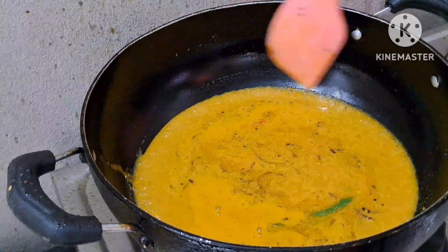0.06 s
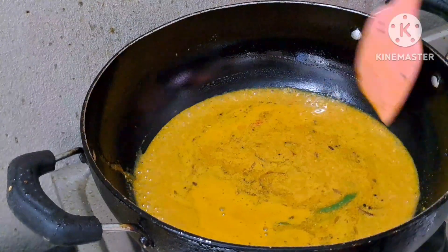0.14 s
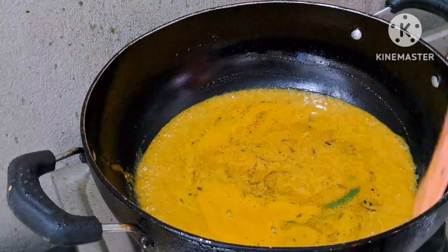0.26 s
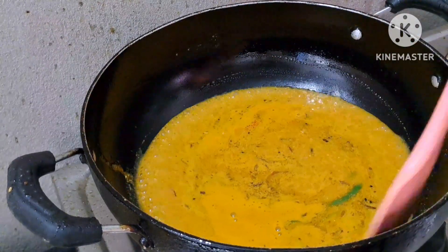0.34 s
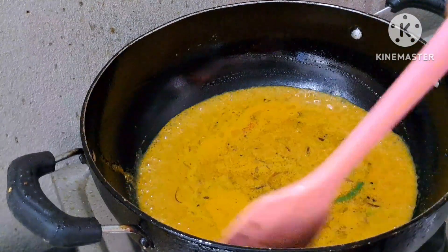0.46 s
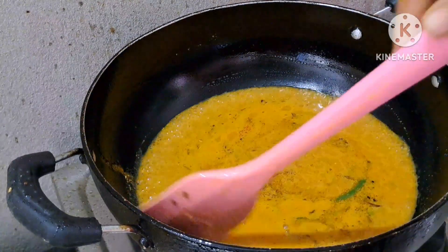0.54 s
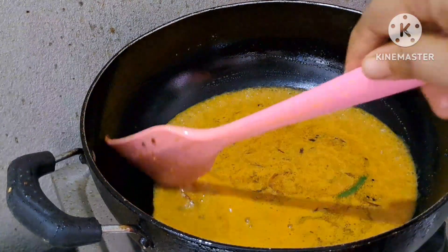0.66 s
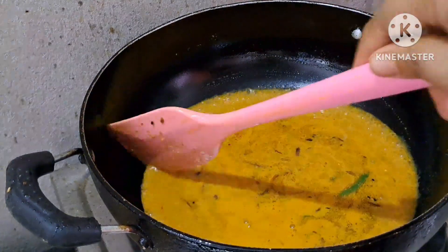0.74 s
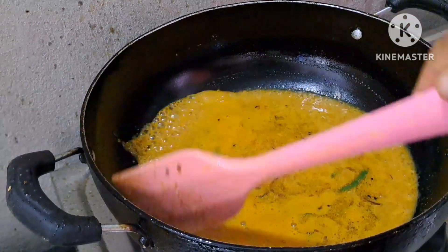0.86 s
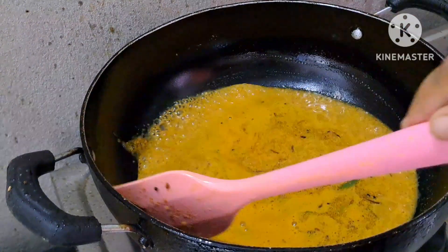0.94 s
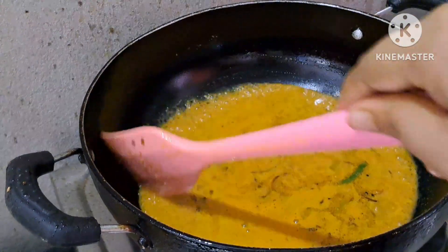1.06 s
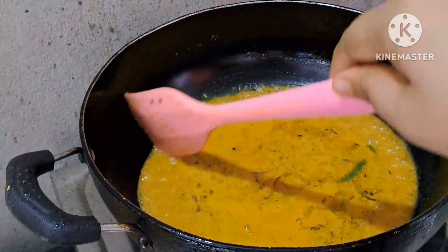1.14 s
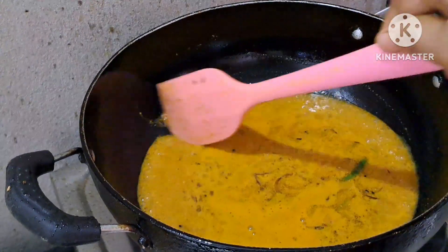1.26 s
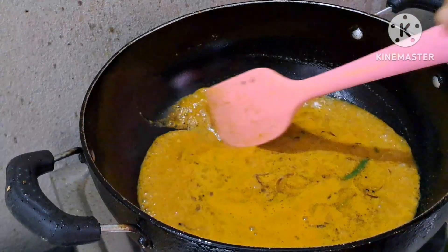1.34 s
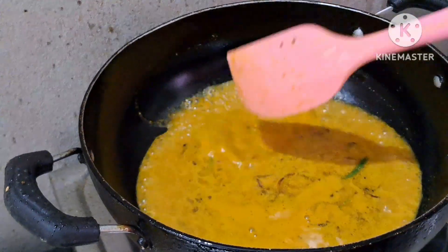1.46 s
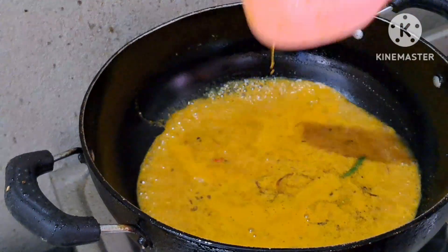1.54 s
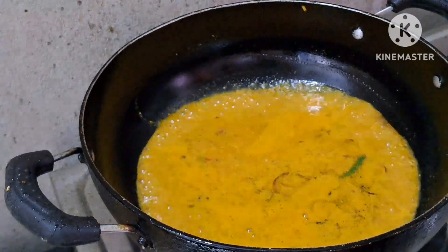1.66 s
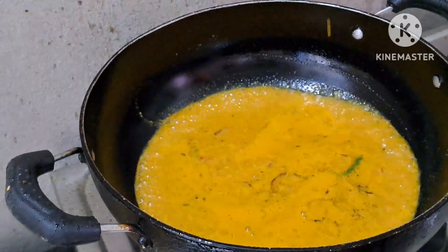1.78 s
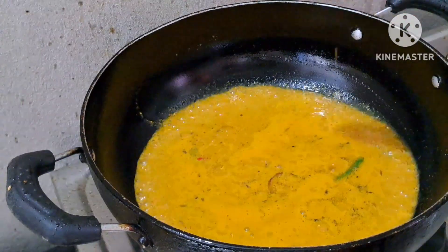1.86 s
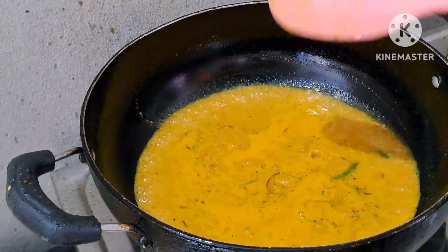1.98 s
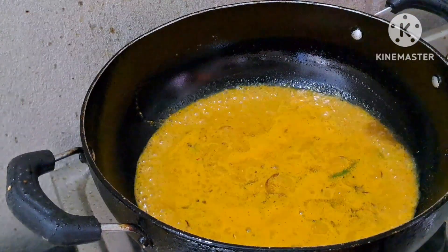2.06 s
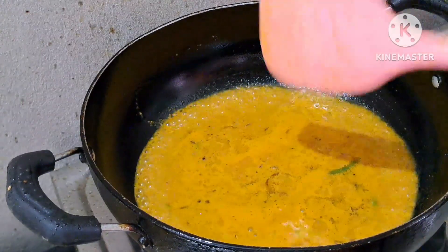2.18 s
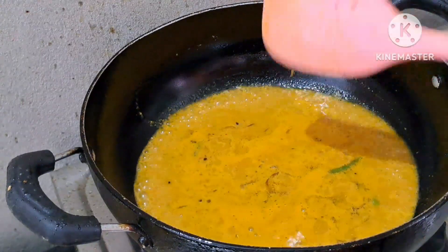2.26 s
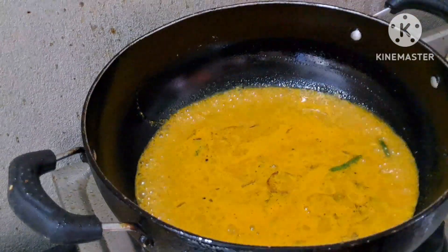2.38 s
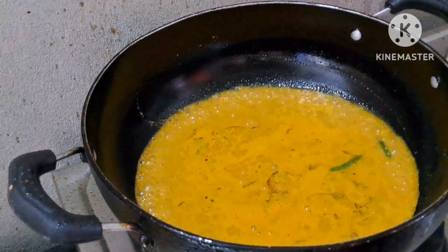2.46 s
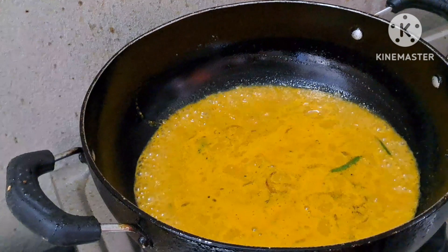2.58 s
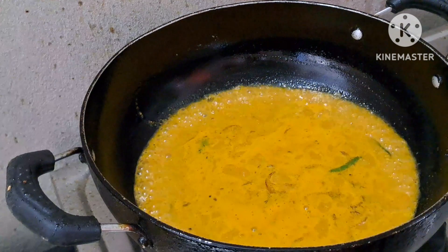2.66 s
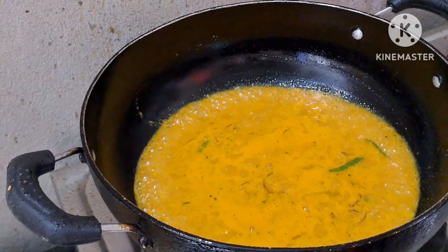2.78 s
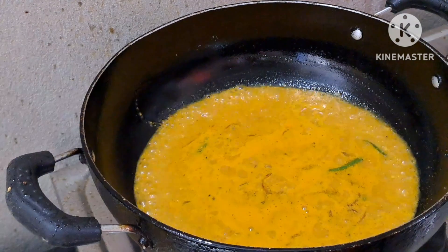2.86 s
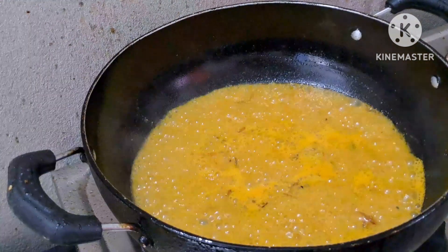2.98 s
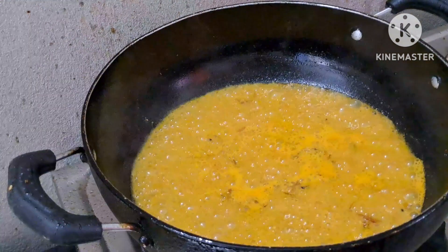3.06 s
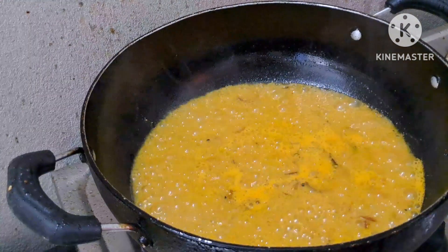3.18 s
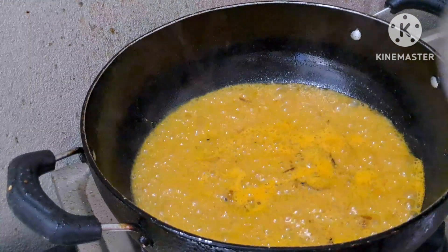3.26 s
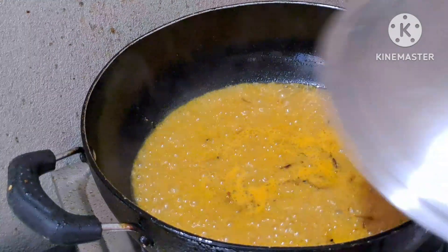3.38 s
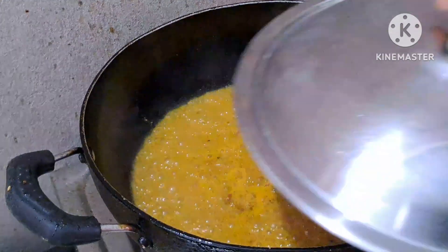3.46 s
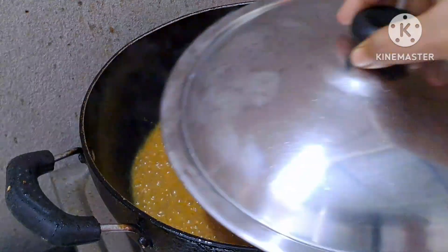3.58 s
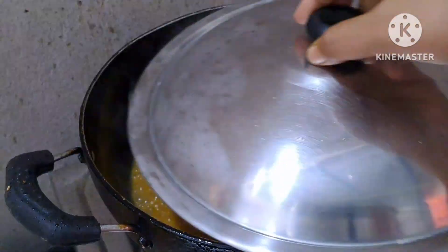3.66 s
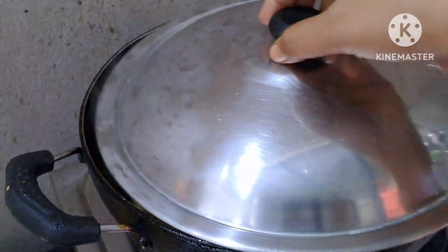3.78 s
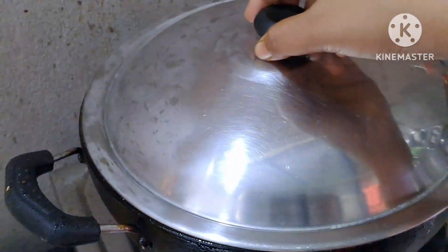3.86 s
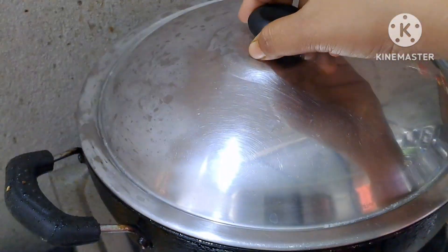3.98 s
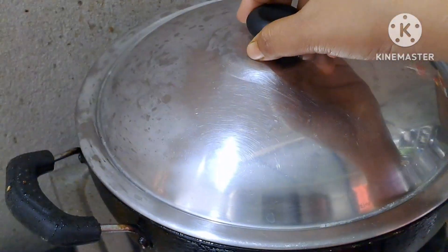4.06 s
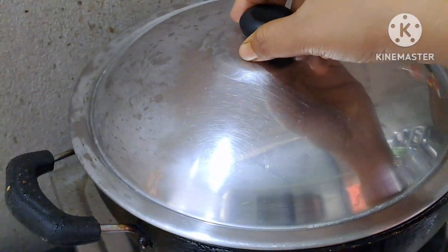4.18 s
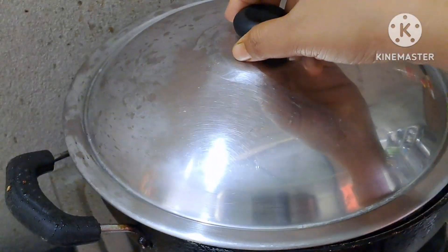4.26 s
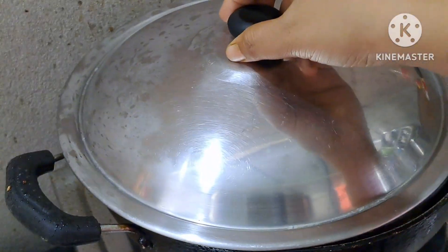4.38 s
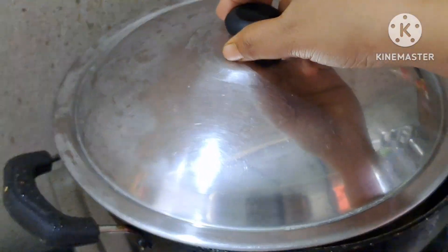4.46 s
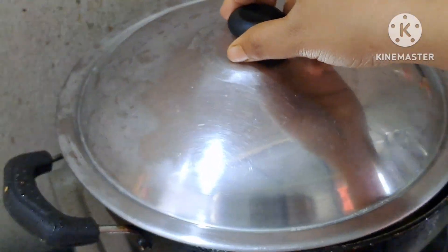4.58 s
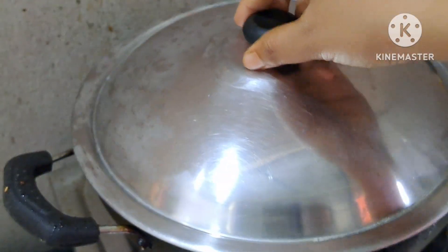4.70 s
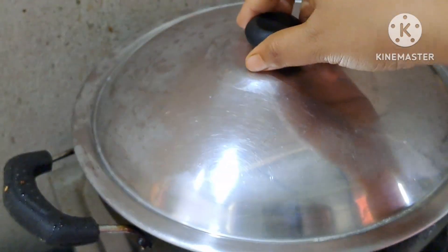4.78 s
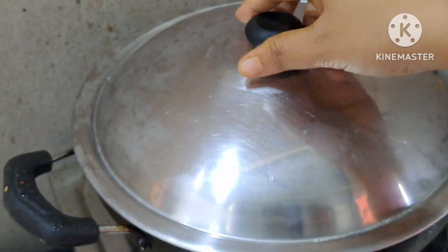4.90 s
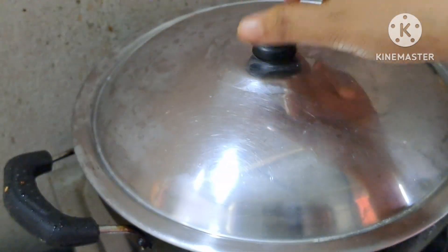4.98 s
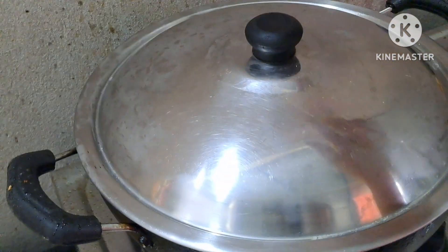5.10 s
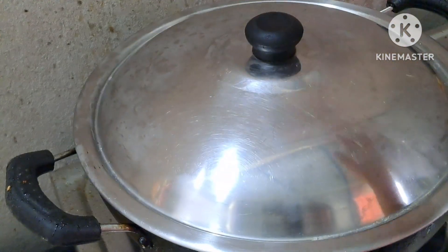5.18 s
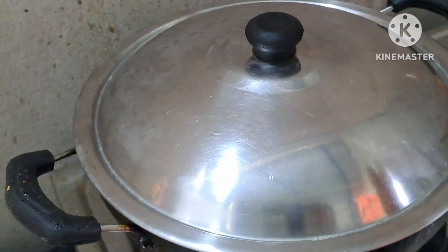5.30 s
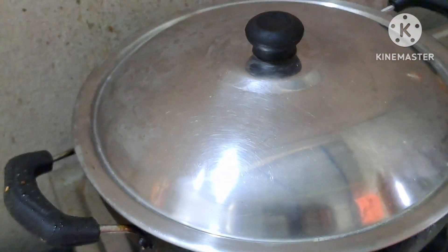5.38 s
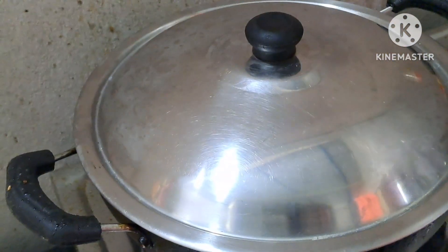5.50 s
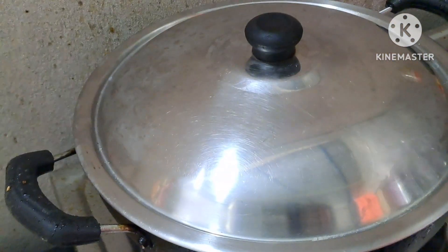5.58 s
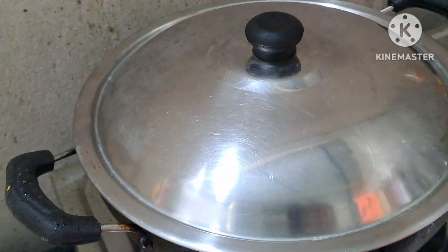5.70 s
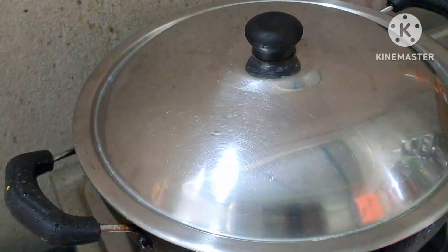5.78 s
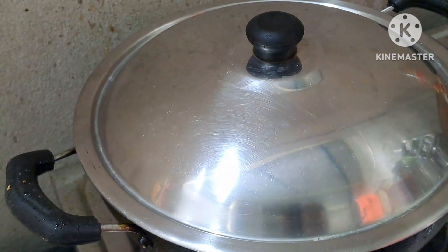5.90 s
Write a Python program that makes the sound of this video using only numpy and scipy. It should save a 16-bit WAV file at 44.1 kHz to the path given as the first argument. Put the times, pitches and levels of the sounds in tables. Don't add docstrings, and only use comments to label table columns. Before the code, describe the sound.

Close stereo microphones in a small kitchen pick up thick gravy simmering over a low burner rumble. A soft spatula bumps and wipes the pan, shaking the stove stand, and leaves a faint wet squeak. The sizzle livens up, then a steel lid clangs loudly on the rim and rattles. After small dull nudges it drops into place with a ringing clunk, and the simmering turns muffled and quiet.

```python
import sys
import numpy as np
from scipy import signal
from scipy.fft import rfft, irfft
from scipy.io import wavfile

SR = 44100
rng = np.random.default_rng(int(sys.argv[2]) if len(sys.argv) > 2 else 0)


def transcribe(u):
    v = np.clip(np.atleast_2d(u).T, -1, 1)
    q = np.round(v * 32767).astype(np.int16)
    wavfile.write(sys.argv[1], SR, q)


def attenuation_scalar(level_db):
    decades = np.asarray(level_db, float) / 20
    return 10 ** decades


N = 261954

# time in seconds, share of the pan covered.
COVER = [
    (0, 0.25),
    (3.55, 0.049),
    (4.1, 0.09),
    (4.9, 0.85),
    (5.94, 1),
]
# time in seconds,
# sizzle in dB.
VIGOUR = [(0, -53.5), (.2, -55), (.3, -58.5), (.55, -56.5), (.8, -58), (1.15, -55.5), (1.7, -57.5),
          (2.98, -56), (3.04, -53), (3.55, -54.5), (4.1, -62), (4.6, -64), (4.9, -59.5), (5.3, -66),
          (5.94, -63)]
# pitch in Hz, level in dB, t60 in seconds.
STAND = [(55.6, -1.5, 0.61), (105.6, 1.5, 0.38), (137.5, 0, 0.19), (195, -2.5, 0.31), (240, -20.5, 0.15)]
# pitch in Hz, level in dB per Hz.
CLATTER = [(53, -41), (90, -5), (307, -8.5), (350, -12.5), (443, -10.5), (538, -13), (1070, -7),
           (1550, -17), (2480, -7.5), (3990, -14), (4540, -10.5), (5630, -20.5), (15500, -30.5)]
# pitch in Hz, t60 in seconds.
TAIL_T60 = [(60, 0.93), (300, 0.58), (1000, 0.22), (4000, 0.61), (12000, 0.24)]
# pitch in Hz, left-right likeness.
CLOSE_LIKENESS = [(60, 0.95), (130, 1), (290, 0.89), (640, 0.52), (1410, 0.031), (3100, -1.4),
                  (6820, -0.33), (15000, -0.13)]
EDGES = 30 * 2 ** np.arange(0, 9.1, 1 / 3)
CENTRES = np.sqrt(EDGES[1:] * EDGES[:-1])


def in_time(rows):
    s, *columns = np.transpose(rows)
    return np.array([np.interp(np.arange(N) / SR, s, column) for column in columns])


def at_hz(points, hz):
    point_hz, values = np.transpose(points)
    return np.interp(np.log(hz), np.log(point_hz), values)


def across(columns, column_hz, hz):
    place = np.interp(np.log(hz), np.log(column_hz), np.arange(len(column_hz)))
    k = min(int(place), len(column_hz) - 2)
    return columns[k] + (place - k) * (columns[k + 1] - columns[k])


def rms_one(x):
    return x / np.sqrt(np.mean(x ** 2) + 1e-20)


def drift(rate):
    r = np.exp(-80 * np.pi * rate / SR)
    slow = signal.lfilter([1], [1, -2 * r, r * r], rng.standard_normal(N // 40 + 2002))[2000:]
    return np.interp(np.arange(N) / 40, np.arange(len(slow)), rms_one(slow))


def grains(per_s, spread_db):
    sizes = attenuation_scalar(spread_db * np.minimum(rng.exponential(1, N), 5)) * rng.choice([-1, 1], N)
    return rms_one(sizes * (rng.random(N) < per_s / SR))


def swells(rows, rise, fade):
    t = np.arange(N) / SR
    events = []
    for (s, hold, db), fall in zip(rows, np.broadcast_to(fade, len(rows))):
        lost_db = np.maximum(rise * (s - t), fall * (t - s - hold))
        events.append(db - np.maximum(lost_db, 0))
    top = np.max(events, axis=0)
    return np.where(top > -95, top, -200)


def strokes(rows, rise, linger):
    s, level_db, weight_db, hardness_db, fade = np.transpose(rows)
    parts = (weight_db, linger), (0, 1), (hardness_db, 1)
    drive = [swells(np.transpose([s, 0 * s, level_db + db]), rise, share * fade) for db, share in parts]
    return np.array(drive)


def touches(rows, thud_db):
    s, knock_db, hz, ring_db, hardness_db = np.transpose(rows)
    return np.transpose([s, knock_db, hz, knock_db + thud_db, ring_db, ring_db + hardness_db])


def ring(clicks, hz, t60, lag_s):
    pole, swell = attenuation_scalar(-60 / (np.array([t60, 2.18 / hz]) * SR)) * np.exp(2j * np.pi * hz / SR)
    unlike = np.arccos(np.clip(at_hz(CLOSE_LIKENESS, hz), -1, 1)) * rng.normal(0, 0.61)
    turn = 2 * np.pi * hz * lag_s + unlike
    driven = np.flatnonzero(clicks)
    span = slice(driven[0], driven[-1] + round(2 * t60 * SR))
    z = signal.lfilter([pole - swell], np.poly([pole, swell]), clicks[span] + 1e-18)
    out = np.zeros((2, N))
    out[:, span] = (z * np.exp(-1j * turn)).imag, z.imag
    return out


def struck(modes, hits, rubbing_db, column_hz, knock_cycles, hit_db, rub_db, tail_db, lag_s):
    s, knock_db, knock_hz, *blows_db = np.transpose(hits)
    at = np.round(s * SR).astype(int)
    slips = grains(per_s=1100, spread_db=3.0)
    sound = 0
    for i, level_db, hz in zip(at, knock_db, knock_hz):
        knock = (np.arange(N) == i) * attenuation_scalar(level_db + 1.0)
        sound = sound + ring(knock, hz, knock_cycles / hz, lag_s / 2)
    for hz, level_db, t60 in modes:
        clicks = slips * attenuation_scalar(across(rubbing_db, column_hz, hz) + rub_db)
        clicks[clicks ** 2 < 1e-16] = 0
        uneven = attenuation_scalar(rng.normal(0, 1.8, len(at))) * rng.choice([-1, 1], len(at))
        clicks[at] += attenuation_scalar(across(blows_db, column_hz, hz) + hit_db) * uneven
        sound = sound + attenuation_scalar(level_db) * ring(clicks, hz, t60, lag_s)
    wash = []
    for hz in CENTRES:
        energy = attenuation_scalar(2 * (across(rubbing_db, column_hz, hz) - 32.0))
        energy[at] += attenuation_scalar(2 * across(blows_db, column_hz, hz))
        crack = signal.lfilter([1], [1, -attenuation_scalar(-120 / (0.044 * SR))], energy)
        tail = signal.lfilter([1], [1, -attenuation_scalar(-120 / (at_hz(TAIL_T60, hz) * SR))], energy)
        wash.append((crack + attenuation_scalar(-31.5) * tail) * attenuation_scalar(2 * (tail_db + at_hz(CLATTER, hz))))
    return sound, np.array(wash)


def with_neighbours(modes, level_db, spread, t60_share):
    crowd = [(hz * (1 + spread * rng.normal()), db + level_db + rng.normal(0, 2.5), t60_share * t60)
             for hz, db, t60 in modes for _ in range(3)]
    return modes + crowd


def close_modes(level_db, t60_share):
    pitches = np.geomspace(330, 14000, 36) * rng.uniform(1.0, 1.03, 36)
    return [(hz, at_hz(CLATTER, hz) + level_db + rng.normal(0, 1.6), t60_share * at_hz(TAIL_T60, hz))
            for hz in pitches]


def lid_clanging(column_hz):
    # pitch in Hz, level in dB.
    free_modes = [(444.5, -49), (1042, -34), (1109, -29.5), (1781, -33), (2552, -33.5), (3112, -42),
                  (3268, -38), (3790, -49), (4250, -43), (4588, -37), (4916, -40), (5050, -43), (5362, -44),
                  (4690, -35), (6106, -50), (6885, -43.5), (7773, -50), (8070, -45), (8689, -52),
                  (9022, -62), (9641, -62), (10885, -59), (11321, -56.5)]
    more_free_modes = [(4410, -40), (826, -48.5), (1242, -45), (1410, -44.5), (2060, -76), (2319, -33.5),
                       (2404, -39)]
    # time in seconds, knock peak in dB, knock pitch in Hz, ring in dB, hardness in dB.
    clangs = [
        (3.596, -3.5, 1400, -10.5, -18.5),
        (3.608, -13, 1130, -12.5, -16.5),
        (3.658, -11, 1090, -15, -15),
        (3.681, -2.5, 1110, -18, 3),
        (3.734, -10.5, 1030, -20.5, 0.6),
        (3.761, -15, 990, -17, -6),
        (3.818, -13, 1140, -19, 0.5),
        (3.847, -17, 1080, -19.5, -3),
        (3.896, -10.5, 1160, -19, -11.5),
        (3.974, -20.5, 770, -28, -10),
    ]
    # time in seconds, thud under the knock in dB.
    lowering = [
        (3.6, -35),
        (3.85, -10),
    ]
    # start in seconds, ring in dB, weight in dB, hardness in dB, fade in dB per s.
    sliding = [
        (3.6, -27, -12, 0.5, 172.5),
        (3.688, -15, -23, 1, 148),
        (3.846, -39, 16, 21.5, 300.5),
        (3.91, -47, 19.5, 12, 200.5),
        (3.996, -31.5, -8, -11, 400),
    ]
    free = [(hz, level_db + 31.0, 0.4 * (1000 / hz) ** 0.32) for hz, level_db in free_modes + more_free_modes]
    free = with_neighbours(free, level_db=-9.5, spread=.028, t60_share=0.63)
    free = free + close_modes(level_db=-2.0, t60_share=0.67)
    stand = [(hz, level_db - 7.0, 0.77 * t60) for hz, level_db, t60 in STAND]
    thud_db = np.interp(np.array(clangs)[:, 0], *np.transpose(lowering))
    return struck(free + stand, touches(clangs, thud_db), strokes(sliding, rise=4600, linger=.52), column_hz,
                  knock_cycles=13.0, hit_db=-6.0, rub_db=-35.5, tail_db=2.5, lag_s=2e-4)


def lid_nudged(column_hz):
    # pitch in Hz, level in dB, t60 in seconds.
    dull_rim = [(224, -9, .12), (308, -1, 0.1), (364, -10, 0.089), (430, -1.5, 0.13), (750, -1.5, 0.12),
                (1200, -9, .1), (1750, -4, .12), (2060, -24, .3), (2344, -4, 0.11), (2548, -4, .06),
                (3280, -7.5, .05), (4440, -6, 0.04)]
    # time in seconds, knock peak in dB, knock pitch in Hz, ring in dB, hardness in dB.
    nudges = [
        (4.22, -46, 330, -71, 5),
        (4.266, -42, 308, -77, 9),
        (4.414, -34.5, 400, -50, -17),
        (4.689, -38.5, 430, -46, -24.5),
        (4.737, -35.5, 750, -35.5, -15),
        (4.758, -17, 295, -43, -8.5),
    ]
    # start in seconds, ring in dB, weight in dB, hardness in dB, fade in dB per s.
    shifting = [
        (4.272, -54.5, 8.5, 9.5, 150),
        (4.42, -51.5, 9, -1, 110),
        (4.70, -54.5, 12, 4.5, 120),
        (4.756, -36.5, 7, 2, 220),
        (4.797, -30.5, 2, -7.5, 1500),
    ]
    return struck(dull_rim, touches(nudges, -3.5), strokes(shifting, rise=450, linger=0.96), column_hz,
                  knock_cycles=15.0, hit_db=2.0, rub_db=-31.5, tail_db=3.0, lag_s=-5e-5)


def lid_seating(column_hz):
    # pitch in Hz, level in dB, t60 in seconds.
    seated_modes = [(109.1, -8.5, 0.34), (810, -7.5, 0.24), (1070, -6.5, 0.21), (1146, -19.5, 0.54),
                    (1396, -17, 1.1), (1801, -2, 0.5), (2497, -6, 0.41), (3116, -6.5, 0.41),
                    (3284, -7.5, 0.37), (3408, -26, 1.18), (3816, -6, 0.16), (3796, -12, 0.4),
                    (4370, -20, 0.41), (4510, -4.5, 0.15), (4180, -13.5, 0.3), (4640, -10, 0.3),
                    (4985, -11.5, 0.34), (5325, -14, 0.38), (5860, -28.5, 0.4), (6660, -13, 0.2),
                    (8240, -18, 0.52), (8716, -26, 0.24)]
    low_seated_modes = [(201.7, -20.5, 0.45), (250, -11.5, 0.15), (306.5, -10, .2), (364, -18, 0.12),
                        (431, -17, 0.18), (770, -6.5, 0.22), (884, -10, 0.62), (1780, -9, 0.55)]
    # time in seconds, knock peak in dB, knock pitch in Hz, ring in dB, hardness in dB.
    seating = [
        (4.801, -11, 845, -25, -11.5),
        (4.818, -3, 900, -22.5, 4),
        (4.8205, -5, 217, -22.5, -7.5),
        (4.872, -35, 900, -55.5, 18.5),
    ]
    # start in seconds, ring in dB, weight in dB, hardness in dB, fade in dB per s.
    settling = [
        (4.823, -19, -3, 1.7, 1493),
        (4.84, -36, 2, 1.5, 75.5),
    ]
    seated = [(hz, level_db, min(t60, 0.53 * (1000 / hz) ** 0.37))
              for hz, level_db, t60 in seated_modes + low_seated_modes]
    seated = with_neighbours(seated, level_db=-2.5, spread=.035, t60_share=0.5)
    seated = seated + close_modes(level_db=-7.0, t60_share=0.65)
    return struck(seated, touches(seating, -14), strokes(settling, rise=5000, linger=1.1), column_hz,
                  knock_cycles=6.75, hit_db=-3.5, rub_db=-33.0, tail_db=2.5, lag_s=-0.0001)


def lid():
    column_hz = [300, 1300, 5000]
    clang, nudge, seat = lid_clanging(column_hz), lid_nudged(column_hz), lid_seating(column_hz)
    return clang[0] + nudge[0] + seat[0], clang[1] + nudge[1] + seat[1]


def spatula():
    # pitch in Hz, level in dB, t60 in seconds.
    pan_modes = [(400, -8, 0.078), (523, -12, 0.23), (754, -6, 0.13), (1090, 2, 0.04), (1393, -4, 0.15),
                 (1715, 7.5, 0.05), (2145, 1, 0.047), (2260, -11, .07), (4280, -3, 0.034)]
    # time in seconds, knock of the blade's edge in peak dB, push in dB.
    bumps = [(0.012, -34.5, -46), (0.067, -39, -35), (0.412, -33.5, -33.5), (0.447, -38, -33),
             (0.88, -52, -38.5), (0.973, -37, -37), (1.005, -24, -32), (1.086, -30, -28),
             (1.143, -39, -36.5), (1.243, -39, -30), (1.285, -46, -33)]
    # start in seconds, wiping in dB, shaking above it in dB, fade in dB per s.
    wipes = [
        (0, -37, 10, 265),
        (.068, -40, -7, 150),
        (.422, -40.5, -9, 130),
        (.59, -70.5, 22, 120),
        (.885, -49, 3, 52),
        (1.012, -34, 7.5, 240),
        (1.094, -38.5, 6, 116),
        (1.256, -41.5, 8.5, 85),
    ]
    blade_hz, push_in_pan_db, tick_db = 1720, -10, -20.5
    drag = [(s, db, shake_db, -8.0, fade) for s, db, shake_db, fade in wipes]
    hits = [(s, db, blade_hz, push_db, push_db + push_in_pan_db, db + tick_db) for s, db, push_db in bumps]
    return struck(STAND + pan_modes, hits, strokes(drag, rise=760, linger=0.74), [120, 900, 2800],
                  knock_cycles=10.3, hit_db=-1.5, rub_db=-37.5, tail_db=2.5, lag_s=1e-4)


def pings():
    # time in seconds, peak in dB, pitch in Hz, t60 in seconds.
    favoured = [(3.595, -11.5, 870, 0.021), (3.595, -18, 2282, 0.075), (3.61, -16.5, 3262, 0.11),
                (3.682, -21.5, 6105, 0.49), (3.83, -28, 445, 0.47), (4.4, -58.5, 2060, 1.2),
                (4.69, -41, 400, .4), (1.005, -40, 2130, 0.054), (1.086, -38.5, 2130, 0.039),
                (0.45, -53, 1800, .08), (4.818, -19.5, 3284, 0.22), (4.82, -18.5, 2300, 0.15),
                (4.87, -45, 4900, 0.48), (3.6, -36, 150, 0.55), (3.975, -36, 1110, 0.38),
                (3.9, -39, 4915, 0.37), (4.8, -14, 845, .03), (4.819, -21, 1793, .12),
                (4.82, -22.5, 4550, .12), (4.816, -15.5, 135, .09), (4.82, -27.5, 5300, 0.14)]
    return sum(ring((np.arange(N) == round(s * SR)) * attenuation_scalar(db), hz, t60, 5e-5) for s, db, hz, t60 in favoured)


def squeak():
    # time in seconds, level in dB, pitch in Hz.
    wet_rub = [
        (1.34, -100, 790),
        (1.38, -57, 799),
        (1.44, -53.5, 801),
        (1.46, -66, 835),
        (1.52, -68, 790),
        (1.6, -68, 790),
    ]
    level_db, hz = in_time(wet_rub + [(1.65, -140, 783)])
    tone = np.sin(2 * np.pi * np.cumsum(hz) / SR)
    return attenuation_scalar(level_db + 2.0 * drift(30)) * tone * attenuation_scalar([[1.5], [-1.5]])


def bubbling():
    # start in seconds, length in seconds, level in dB.
    boils = [
        (.52, 0.044, -58),
        (1.95, 0.28, -55),
        (2.85, .1, -57.5),
        (4.88, 0.13, -56.5),
    ]
    calm_db, lid_shuts_db = -57, 4.5
    follows = 0.97
    steady = -58.5 + follows * (in_time(VIGOUR)[0] - calm_db) - lid_shuts_db * in_time(COVER)[0]
    return np.maximum(steady, swells(boils, rise=36, fade=30.4))


def simmer(patchy_db):
    # pitch in Hz, level in dB per Hz.
    open_colour = [(1470, -38.5), (2500, -0.5), (3580, -4), (3920, -3), (5920, -9), (7450, -4),
                   (8610, -6.5), (12200, -2), (15500, -7.5)]
    shut_colour = [(1470, -48), (2500, -23), (2960, -15.5), (5240, -10), (5700, -11.5), (7060, -8),
                   (7680, 0), (8550, -4), (10400, -1.5), (15500, -10.5)]
    bubble_colour = [(150, -33.5), (250, -16.5), (345, -5), (379, -7.5), (557, -7.5), (862, -4.5),
                     (1090, -15.5), (1360, -2.5), (2060, -5), (2620, -14), (3000, -12.5), (3900, -43),
                     (6600, -120)]
    burner_colour = [(18, -37), (30, -14.5), (43, -8.5), (59, 0), (86, -10), (175, -10.5), (210, -24),
                     (300, -16), (390, -41.5), (660, -120)]
    # start in seconds, length in seconds, level in dB.
    shudders = [
        (0, .03, -41),
        (1.15, 0.137, -45),
        (4.88, .05, -49),
    ]
    sizzle_db, bubbling_db = in_time(VIGOUR)[0], bubbling()
    burner_db = -56.5 - 1.2 * np.arange(N) / SR
    rumble_db = np.maximum(burner_db, swells(shudders, rise=50, fade=110))
    cover, together, power = in_time(COVER)[0], drift(4.1), []
    for hz in CENTRES:
        colour_db = (1 - cover) * at_hz(open_colour, hz) + cover * at_hz(shut_colour, hz)
        parts = [sizzle_db + colour_db - 9.5,
                 bubbling_db + at_hz(bubble_colour, hz) - 3.5,
                 rumble_db + at_hz(burner_colour, hz) + 11.5]
        patches = attenuation_scalar(2 * patchy_db * (.3 * together + drift(14)))
        power.append(sum(attenuation_scalar(2 * p) for p in parts) * patches)
    return np.array(power)


def noise_bank(far, close):
    # pitch in Hz, left-right likeness.
    far_likeness = [(60, 0.94), (130, 0.96), (290, 0.86), (640, 0.49), (1410, 0.11), (3100, 0.3),
                    (6820, 0.0044), (15000, 0.11)]
    spit = grains(per_s=1600, spread_db=-1.5)
    white = rng.standard_normal((2, 2, N)) + 0.3 * np.array([spit, np.roll(spit, N // 2)])
    out = 0
    for k, hz in enumerate(CENTRES):
        far_alike = np.clip(at_hz(far_likeness, hz), -1, 1)
        close_alike = np.clip(at_hz(CLOSE_LIKENESS, hz), -1, 1)
        shared = far[k] * far_alike + close[k] * close_alike
        drive = np.sqrt(far[k] + close[k] + shared * [[1], [-1]] + 1e-30) * white[k % 2]
        run_in = np.concatenate([drive[:, SR // 4:0:-1], drive], axis=1)
        sos = signal.butter(2, EDGES[k:k + 2], "band", fs=SR, output="sos")
        mid, side = signal.sosfilt(sos, run_in)[:, SR // 4:] / np.sqrt(1000 / SR)
        out = out + mid + side * [[1], [-1]]
    return out


def bubbles(per_s, level_db):
    born, dealt = grains(per_s, spread_db=1.5), rng.integers(0, 12, N)
    sizes_hz = np.geomspace(750, 2600, 12)
    pops = sum(ring(born * (dealt == k), hz, 43.0 / hz, -0.00018) for k, hz in enumerate(sizes_hz))
    return rms_one(pops) * attenuation_scalar(bubbling() + level_db)


def bowl():
    air = ring(rng.standard_normal(N), hz=1372.0, t60=.018, lag_s=0)[1]
    return rms_one(air) * attenuation_scalar(bubbling() - 6.5 + 2.2 * drift(3.0))


def stand_hum():
    # start in seconds, length in seconds, level in dB.
    hums = [
        (1.2, .1, -55),
        (1.5, 0.02, -42),
        (2.05, .05, -53),
        (2.6, 0.37, -50.5),
        (5.55, 0.089, -60.5),
    ]
    hum = ring(rng.standard_normal(N), hz=57.2, t60=1.0, lag_s=1e-4)
    return rms_one(hum) * attenuation_scalar(np.maximum(-69.5, swells(hums, rise=110, fade=170)))


def handling():
    # time in seconds, level in dB.
    hand = [
        (0, -30),
        (.1, -43.5),
        (.25, -42.5),
        (.32, -100),
    ]
    lumps = ring(rng.standard_normal(N), hz=70.0, t60=.05, lag_s=0)[0]
    return rms_one(lumps) * attenuation_scalar(in_time(hand)[0]) * [[0], [1]]


def scene():
    steel, steel_wash = lid()
    pan, pan_wash = spatula()
    noise = noise_bank(simmer(patchy_db=1.18), pan_wash + steel_wash)
    gravy = noise + bubbles(per_s=87, level_db=-11.0) + bowl()
    mix = steel + pan + pings() + squeak() + gravy + stand_hum() + handling()
    return mix * attenuation_scalar([[.4], [-.4]])


def low_pass(x):
    return signal.sosfilt(signal.butter(12, 16590, fs=SR, output="sos"), x)


def record(dry):
    rounded = 2.17 * np.tanh(dry / 2.24)
    below_cut = np.fft.rfftfreq(N, 1 / SR) < 15560
    mix = irfft(rfft(rounded) * below_cut, N)
    return low_pass(mix)


dry = scene()
out = record(dry)
transcribe(out)
```